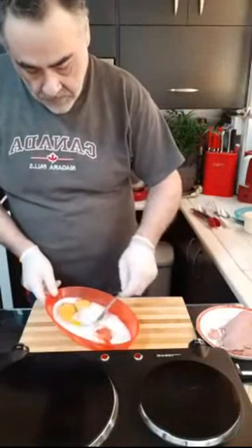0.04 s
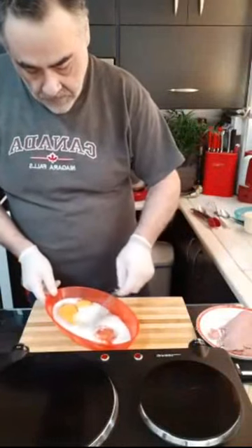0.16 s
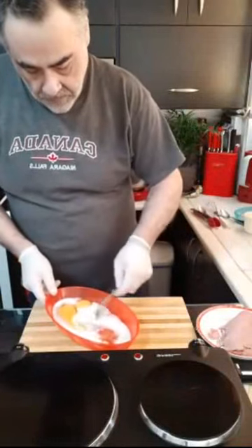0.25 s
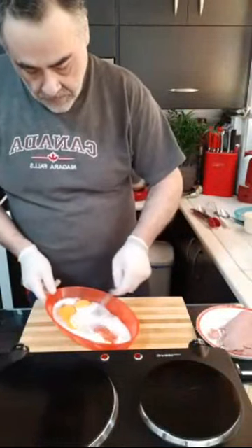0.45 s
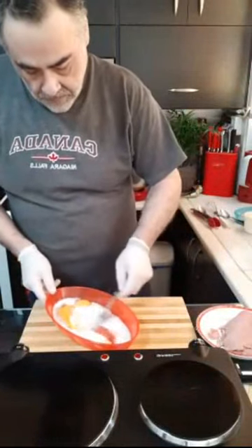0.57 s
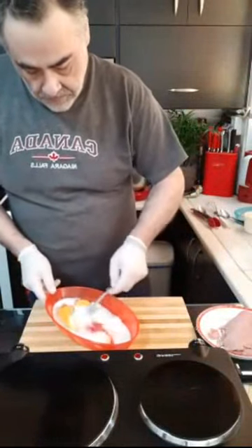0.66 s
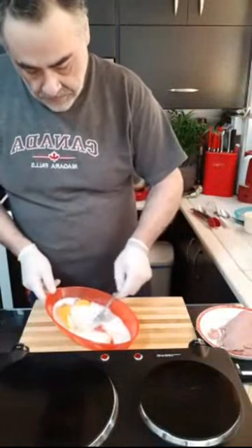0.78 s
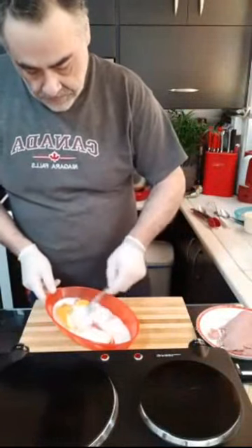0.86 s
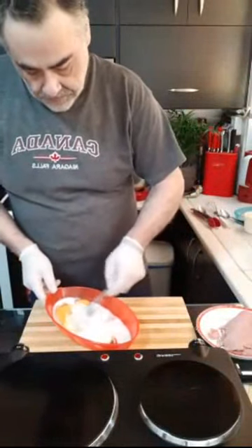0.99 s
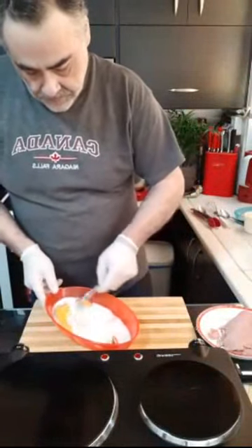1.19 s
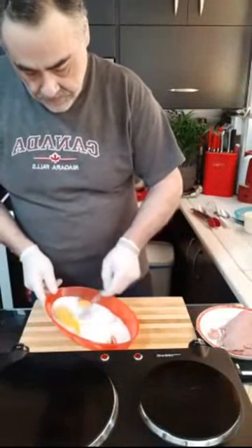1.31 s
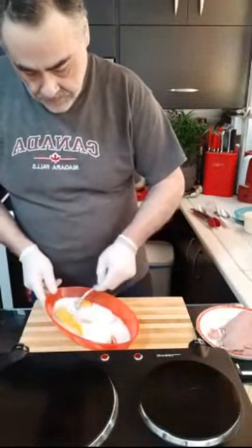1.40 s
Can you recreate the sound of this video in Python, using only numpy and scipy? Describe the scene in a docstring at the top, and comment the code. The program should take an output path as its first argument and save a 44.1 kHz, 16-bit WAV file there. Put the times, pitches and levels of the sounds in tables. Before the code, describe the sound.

A fork beats eggs in a plastic bowl. Faint ticks come before 0.15 s, then a loud bright double clack at 0.2 s and another sharp knock at 0.47 s, with wet egg slops following. Softer strokes fall near 0.67, 0.86, 1.04 and 1.22 s. Two tiny drips tick at 0.98 s, tines scrape at 1.07 and 1.42 s, and low thumps come around 1.25-1.3 s. Faint fridge hum, hard kitchen echo, slightly dull phone sound.

```python
"""A fridge hums under faint air noise in a hard, live kitchen, a metre from a phone: a wavering sine, shaped noise.
A fork beats eggs in a plastic bowl on a board: rough contact noise rings resonances, and a room response follows.
Egg slops between knocks as rising bubbles. Late on come two tiny high drips (gliding tones), scraping tines
(filtered clicks) and two soft low thumps of the bowl on the board (gliding tones).
"""
import sys
import numpy as np
from scipy import signal
from scipy.fft import rfft, irfft
from scipy.io import wavfile
from scipy.ndimage import uniform_filter1d

SR = 44100
rng = np.random.default_rng(int(sys.argv[2]) if len(sys.argv) > 2 else 0)


def inscribe(sig):
    """Save sig as 16-bit PCM at rate SR to the path in sys.argv[1].

    A 1-D sig is mono; a 2-D sig holds one channel per row.
    Samples are clipped to [-1, 1] before scaling.
    """
    pcm = np.round(np.clip(np.atleast_2d(sig).T, -1, 1) * 32767)
    wavfile.write(sys.argv[1], SR, pcm.astype(np.int16))


N = 63945


def undb(db):
    """Amplitude ratio of a level in dB."""
    return 10 ** (np.asarray(db) / 20)


def unit(x):
    """Scale to RMS 1."""
    return x / np.sqrt(np.mean(x ** 2))


def mode(x, hz, t60_s):
    """Damped resonance: a two-pole filter."""
    radius = np.exp(-np.log(1000) / (t60_s * SR))
    w = 2 * np.pi * hz / SR
    return signal.lfilter([np.sin(w)], [1, -2 * radius * np.cos(w), radius * radius], x)


def band(x, hz, q):
    """Second-order band-pass."""
    b, a = signal.iirpeak(min(hz, .4 * SR), q, fs=SR)
    return signal.lfilter(b, a, x)


def curve(table, hz):
    """Value of a (Hz, value) table on a log frequency axis."""
    table_hz, values = np.array(table).T
    return np.interp(np.log(hz), np.log(table_hz), values)


def level_db(table):
    """Level over the scene from a (s, dB) table."""
    return np.interp(np.arange(N) / SR, *np.array(table).T)


def walk(rate_hz):
    """Slow random drift, spread near 1: twice-smoothed random steps."""
    k = int(SR / rate_hz)
    steps = np.repeat(rng.standard_normal(N // k + 1), k)
    return 1.2 * uniform_filter1d(uniform_filter1d(steps, k), k)[:N]


def add(out, x, start_s):
    """Mix x into out at start_s."""
    i = int(start_s * SR)
    out[..., i:i + x.shape[-1]] += x[..., :N - i]


def swell(length_s):
    """Quick rise, slower fall."""
    u = np.linspace(0, 1, int(length_s * SR))
    return np.minimum(u / 0.079, 1) * (1 - u) ** 0.9


def air():
    """Faint flickering kitchen air: white noise shaped in frequency and level."""
    # noise spectrum: (frequency [Hz], relative density [dB])
    spectrum = [(25, -11.5), (60, -2), (110, -4), (190, -4), (430, 3), (650, -10), (1500, -8), (2500, -15),
                (3600, -18.5), (4700, 1.5), (5400, -11), (6500, -6), (9000, -19)]
    # overall level: (time [s], level [dB])
    levels = [(0, -69), (.19, -70), (.5, -63), (1.45, -67)]
    f = np.maximum(np.fft.rfftfreq(N, 1 / SR), 10)
    noise = irfft(rfft(rng.standard_normal(N)) * undb(curve(spectrum, f)), N)
    return unit(noise) * undb(level_db(levels) + 0.58 * walk(20))


def fridge():
    """Fridge hum: one sine wavering in pitch and level."""
    hum_hz = 114.8
    # hum level: (time [s], level [dB])
    levels = [(0.0, -81), (0.242, -94), (0.394, -71), (0.45, -71), (0.508, -65), (0.6, -71), (0.81, -82),
              (1.05, -79), (1.45, -67.5)]
    phase = 2 * np.pi * np.cumsum(hum_hz * (1 + 0.028 * walk(14))) / SR
    return np.sqrt(2) * np.sin(phase) * undb(level_db(levels) + 3.6 * walk(25))


def knocks():
    """Rough short contacts ring every resonance over a grainy crack; returns direct sound and room feed."""
    # bowl, board and fork resonances: (frequency [Hz], T60 [s], relative level [dB])
    body = [(129.4, 0.093, -6), (222.8, 0.02, -2), (392.4, 0.022, -9), (464, 0.055, -3.5), (592, 0.033, -4),
            (882, 0.023, -9.5), (1144, 0.015, 1), (1335, 0.0066, -5), (1640, 0.0076, -4.5),
            (1882, 0.0049, -1), (2343, 0.0043, -6.5), (2727, 0.006, -5.5), (3280, 0.0042, -12),
            (3680, 0.0057, -6.5), (4446, 0.0061, -6.5), (4950, 0.017, -7), (5540, 0.0013, -20),
            (6452, 0.018, -7), (7640, 0.0015, -13.5), (8670, 0.0014, -10), (9960, 0.0037, -16)]
    # edges splitting the resonances into nine groups: (frequency [Hz])
    group_edges_hz = [300, 700, 1000, 1500, 2100, 2900, 4500, 5900]
    # fork knocks: (time [s], nine group levels [dB], crack re ring [dB], room feed [dB], contact [ms])
    knock_table = [(0.0476, -102, -104, -100, -88, -90, -92, -91, -80.5, -80.5, -1.5, -7, 0.81),
                   (0.1128, -100, -100, -98, -101, -83, -81.5, -82, -75.5, -84.5, -5.5, 0, 0.72),
                   (0.2014, -70, -61, -62, -63, -63.5, -53.5, -52, -47, -55.5, 1.5, 3.5, 0.21),
                   (0.2352, -59.5, -48.5, -45.5, -71, -60, -38, -58.5, -35.5, -33, -3.5, -0.5, 0.72),
                   (0.466, -78, -81, -81, -65, -63.5, -59, -67, -68, -64.5, -9.5, 0.5, 0.76),
                   (0.4689, -64, -56, -63.5, -54, -48.5, -51.5, -47, -50.5, -45.5, 2.5, -1.5, 0.91),
                   (.674, -77, -72.5, -61, -67.5, -64.5, -60, -64, -64.5, -63, 0, 0.5, 0.65),
                   (0.8639, -83, -73, -78, -66.5, -66.5, -63, -62.5, -65, -68.5, -1, 0.5, 1.32),
                   (1.0408, -98, -74.5, -70, -65.5, -67.5, -65.5, -65, -59, -81, -0.5, 0.5, 1.01),
                   (1.2151, -87, -88, -84, -74.5, -69, -68, -68, -66, -75, 0, -1, .9),
                   (1.2441, -79, -68, -70, -71, -73, -82, -73, -71, -88, -2, 0, 1.9)]
    crack_q = 2.28
    out, t = np.zeros((2, N)), np.arange(4096) / SR
    click = 1. * (t == 0)
    for start_s, *groups_db, crack_db, room_db, contact_ms in knock_table:
        hit, power = 0, 0
        contact = t * np.exp(-1000 * t / contact_ms)
        noises = rng.standard_normal((len(body), 2, len(t)))
        for (hz, t60_s, db), (noise, grit) in zip(body, noises):
            gain = undb(db + groups_db[np.searchsorted(group_edges_hz, hz)])
            detuned_hz = hz * (1 + 0.028 * noise[0])
            ring = band(mode(contact * noise, detuned_hz, t60_s), hz, 1.36)
            crack = band(band(contact * grit, hz, crack_q), hz, crack_q)
            hit = hit + gain * (unit(ring) + undb(crack_db) * unit(crack))
            # similar filters on a bare click give a smooth spectrum
            click_ring = unit(band(mode(click, hz, t60_s), hz, 1.55))
            click_crack = unit(band(band(click, hz, crack_q), hz, crack_q))
            ring_power = abs(rfft(click_ring)) ** 2
            crack_power = abs(undb(crack_db) * rfft(click_crack)) ** 2
            power = power + gain ** 2 * (ring_power + crack_power)
        # the room feed takes the smooth spectrum and the hit's phase, for an evenly coloured tail
        sent = irfft(np.sqrt(power) * np.exp(1j * np.angle(rfft(hit))))
        add(out, np.array([hit, undb(room_db) * sent]), start_s)
    return out


def room(x):
    """Distinct echoes plus a dense noise tail, each band decaying at its own rate."""
    # main tail decay: (frequency [Hz], T60 [s])
    decay = [(100, 0.4), (400, 0.1747), (1200, .5), (2500, 0.53), (5000, 0.5357), (7000, 0.14),
             (10000, 0.54)]
    # early echoes: (delay [s], level [dB])
    echoes = [(.0025, -11), (.0075, -17.5), (.021, -13), (0.03, -12.5), (0.04, -11)]
    tail_db, build_s = 0.5, 0.0027
    late_db, late_t60_s = -23.5, 1.6  # slower tail from the rooms beyond
    t, ir = np.arange(SR) / SR, 0
    late = undb(late_db - 60 * t / late_t60_s)
    for hz in 60 * 2 ** np.arange(0, 7.6, .5):
        noise = band(rng.standard_normal(SR), hz, 2.3)
        ir = ir + noise * (np.exp(-np.log(1000) * t / curve(decay, hz)) + late)
    ir = ir * (1 - np.exp(-t / build_s))
    ir = ir * undb(tail_db) / np.sqrt(np.sum(ir ** 2))
    for delay_s, db in echoes:
        ir[int(delay_s * SR)] += undb(db)
    return signal.fftconvolve(x, ir)[:N]


def slops():
    """Egg folding over: short low decaying bubbles that glide up."""
    # slops: (start [s], length [s], base level [dB], centre pitch [Hz])
    slop_table = [(0.246, 0.097, -50.5, 487), (0.497, 0.057, -46, 500), (0.701, 0.11, -61.5, 411),
                  (1.058, .07, -67, 437), (0.883, .06, -59, 358), (1.246, 0.05, -54.5, 453)]
    bubbles_per_s, life_cycles, log_pitch_spread, size_range_db = 120.2, 9, 0.24, 6.3
    out, t = np.zeros(N), np.arange(2048) / SR
    for start_s, length_s, db, hz in slop_table:
        env, chance = swell(length_s), rng.random((24, 3))
        count = max(int(bubbles_per_s * length_s), 1)
        for when, pitch, size in chance[:count]:
            bubble_hz = hz * np.exp(log_pitch_spread * (2 * pitch - 1))
            life_s = life_cycles / bubble_hz
            tone = np.sin(2 * np.pi * bubble_hz * t * (1 + 0.035 * t / life_s))
            bubble = tone * np.exp(-3 * t / life_s)
            gain = undb(db + size_range_db * size) * env[int(when * len(env))]
            add(out, gain * bubble, start_s + when * length_s)
    return out


def rounded(table):
    """Soft-edged single tones that glide up a little."""
    glide = 0.04  # from 4 % below the table pitch to 4 % above
    out = np.zeros(N)
    for start_s, length_s, hz, db in table:
        t = np.arange(int(length_s * SR)) / SR
        env = np.sin(np.pi * t / length_s) ** 2
        tone = np.sin(2 * np.pi * hz * t * (1 + glide * (t / length_s - 1)))
        add(out, undb(db) * env * tone, start_s)
    return out


def drips():
    """Small high drips: brief rising tones."""
    # drips: (start [s], length [s], pitch [Hz], peak level [dB])
    drip_table = [(.979, 0.012, 4290, -51), (.992, 0.0045, 4950, -50.5)]
    return rounded(drip_table)


def scrapes():
    """Tines scraping the bowl: dense uneven stick-slip clicks in a broad treble resonance."""
    # scrapes: (start [s], length [s], level [dB], resonance [Hz])
    scrape_table = [(1.069, 0.1, -58.5, 5550), (1.419, 0.078, -56.5, 4020)]
    clicks_per_s, scatter_db, q = 500, 1, 1.95
    out = np.zeros(N)
    for start_s, length_s, db, hz in scrape_table:
        chance, size = rng.random((2, 8192))
        clicks = (chance < clicks_per_s / SR) * undb(-scatter_db * np.log(size))
        clicks = clicks + 0.041 * (size - .5)  # faint hiss under the clicks
        env = swell(length_s)
        rasp = unit(band(band(clicks, hz, q), hz, q))
        add(out, undb(db) * env * rasp[:len(env)], start_s)
    return out


def thumps():
    """Bowl on the board: soft low rising tones."""
    # thumps: (start [s], length [s], pitch [Hz], peak level [dB])
    thump_table = [(1.25, 0.042, 129, -53.5), (1.308, 0.038, 122.5, -57)]
    return rounded(thump_table)


def scene():
    """Sum the direct sources, the room's answer and the background."""
    drip_room_db = -10
    direct, sent = knocks()
    wet, drip = slops() + scrapes(), drips()
    reverb = room(sent + wet + undb(drip_room_db) * drip)
    return (air() + fridge() + direct + reverb + wet + drip + thumps())[None]


def record(dry):
    """Phone microphone: colours the spectrum, dulls the upper treble and cuts the top."""
    # microphone colour: (frequency [Hz], gain [dB])
    mic = [(30, 2), (150, -2.5), (400, -0.5), (620, 0), (760, -3), (960, -0.5), (7000, 0.5), (7500, -11.5),
           (9000, -14.5), (10000, -19)]
    top_hz = 9950
    f = np.maximum(np.fft.rfftfreq(2 * N, 1 / SR), 10)
    coloured = irfft(rfft(dry, 2 * N) * undb(curve(mic, f)))[:, :N]
    return signal.sosfilt(signal.ellip(14, .3, 90, top_hz, fs=SR, output="sos"), coloured)


dry = scene()
out = record(dry)
inscribe(out)
```